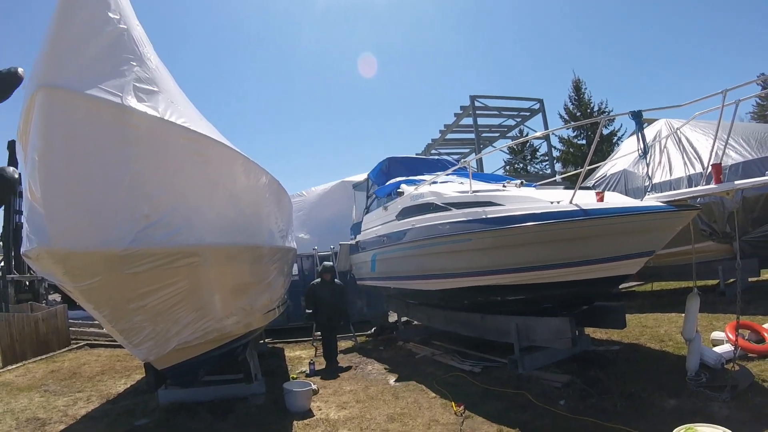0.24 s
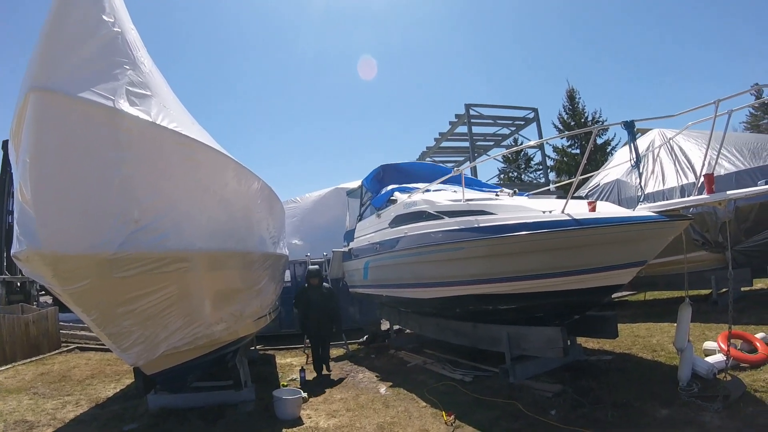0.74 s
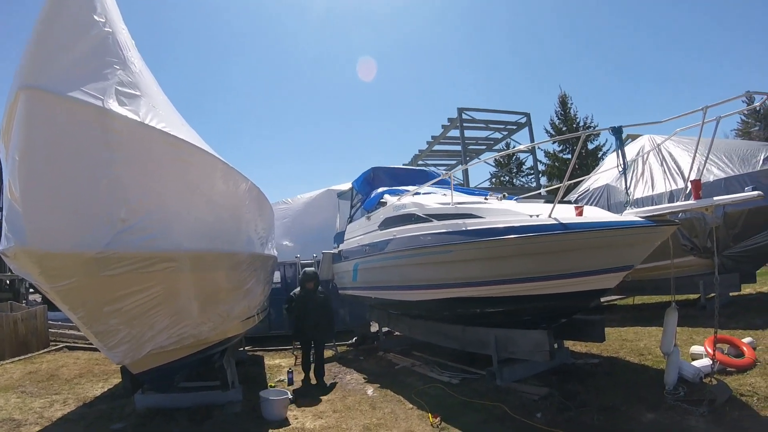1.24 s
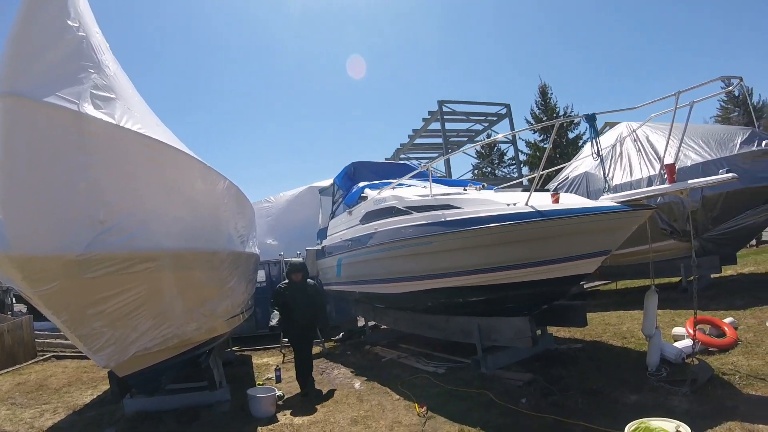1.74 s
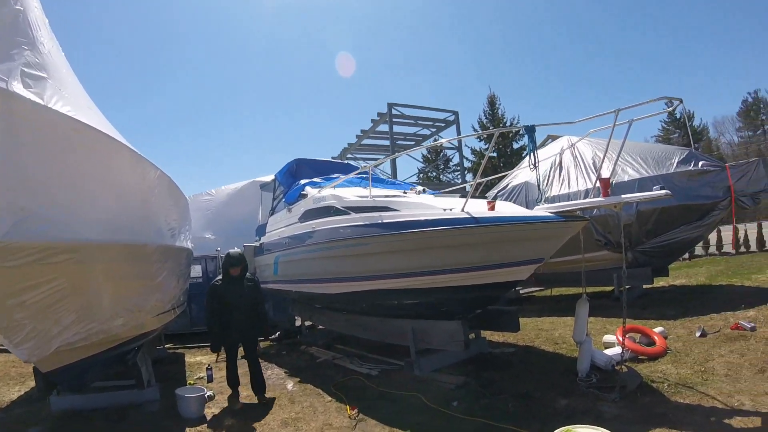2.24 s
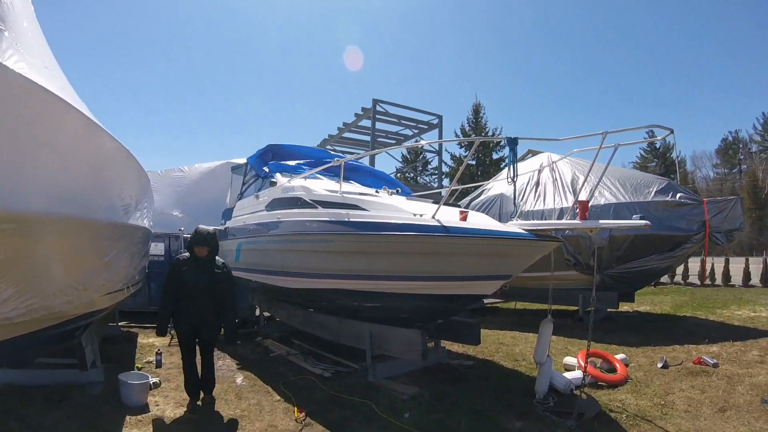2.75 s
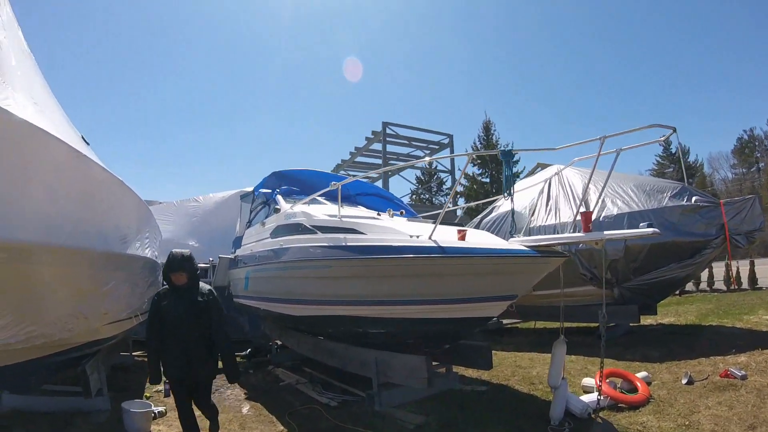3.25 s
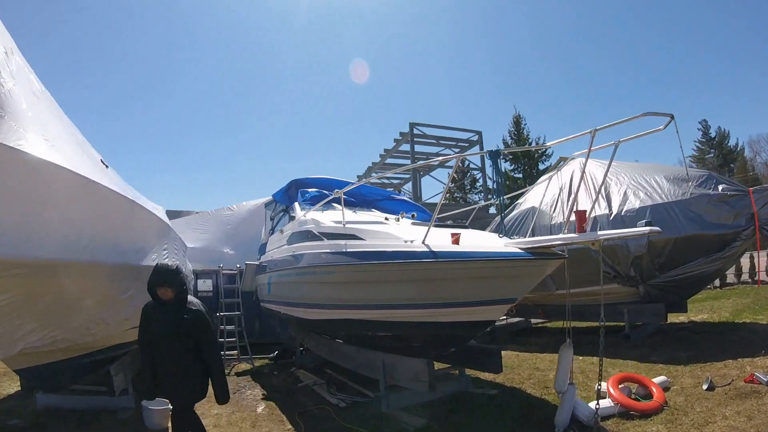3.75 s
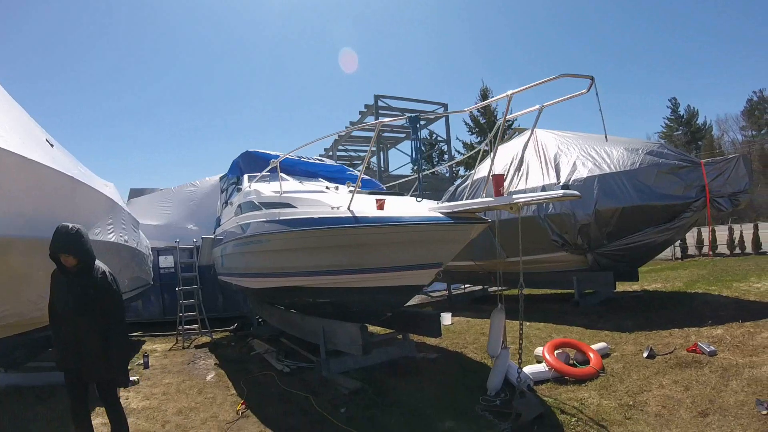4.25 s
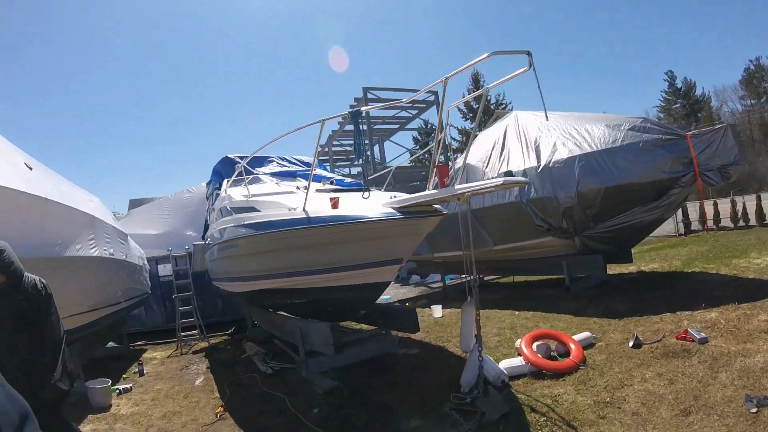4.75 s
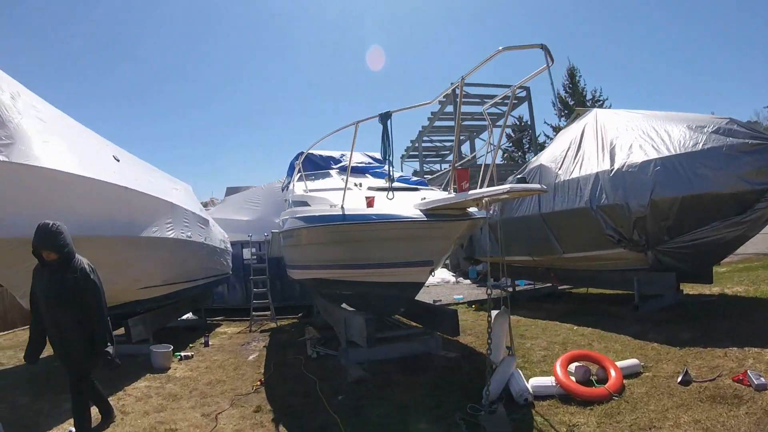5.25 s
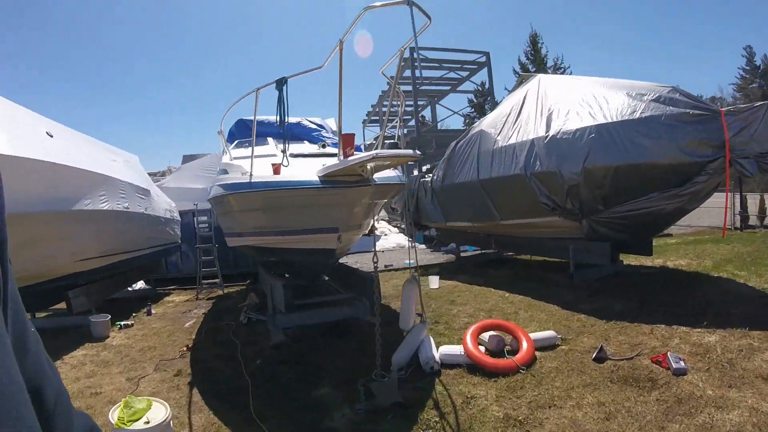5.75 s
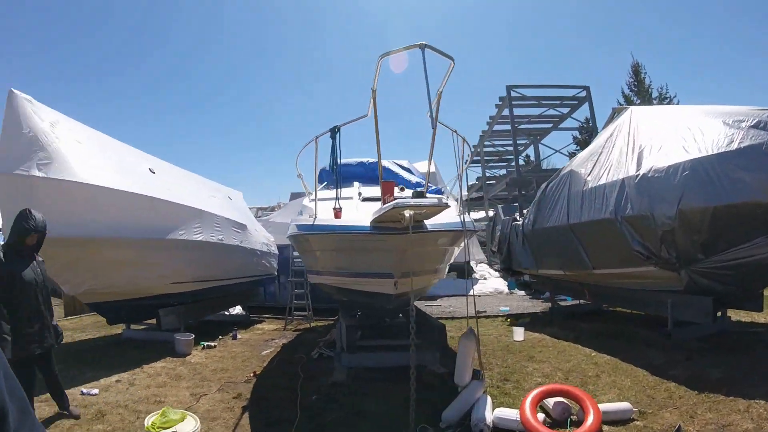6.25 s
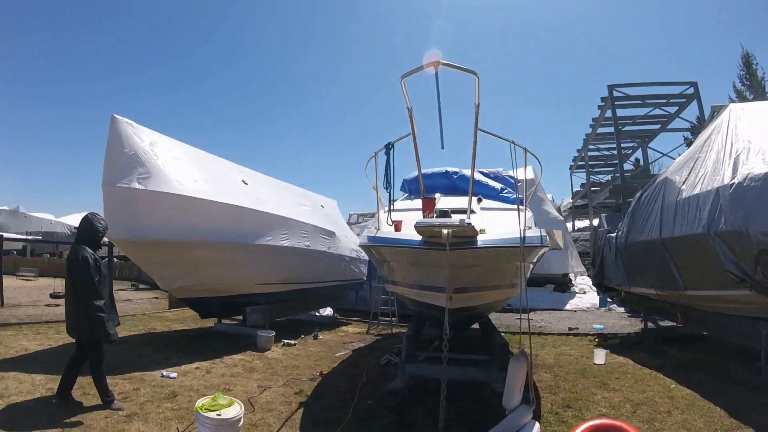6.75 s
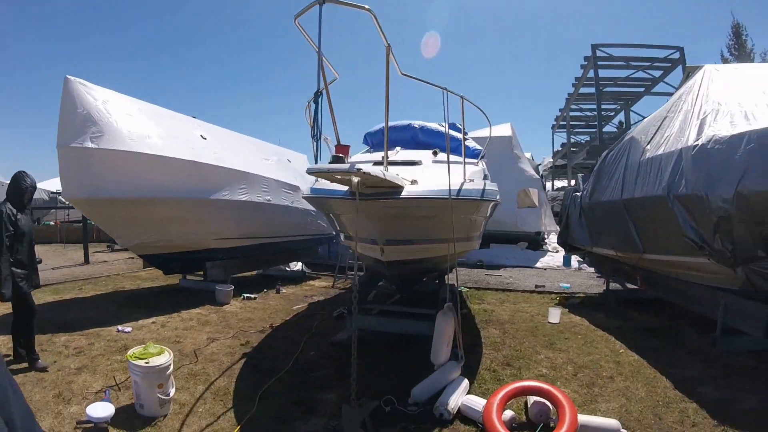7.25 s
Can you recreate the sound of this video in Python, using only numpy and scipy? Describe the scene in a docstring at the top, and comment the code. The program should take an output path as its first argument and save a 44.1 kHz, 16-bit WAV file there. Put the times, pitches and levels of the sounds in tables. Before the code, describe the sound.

From 0 s wind hits an unshielded outdoor microphone in lumpy low rumbles and sharp thuds, fiercest from about 0.8 to 1.2 s, with further gusts near 2 s. Under it an electric buffer runs continuously on a boat hull: a low motor hum around 34 turns per second with a buzzing rasp, a steady whine near 1.2 kHz and soft fan hiss. After 2.3 s the wind drops to light puffs and the machine stands out. Between 2.5 and 4.3 s reflections add a midrange sheen; from 4 s the whine strengthens and scuffing grows. Around 5 to 6.2 s the pad's rapid squeaky clatter swells and the sound is closest and brightest. After 6 s a fuller hull drone rises, strongest past 6.9 s, while treble becomes slightly shaded. A short gust thumps at 6.6 s, a faint high chink rings at 6.94 s, and the buffer is still running at 7.5 s.

```python
"""Gusts buffet the microphone, hardest in the first two seconds, while an electric buffer hums and whines.
The buffer runs steadily against a hull in a boatyard, heard by someone walking past the bows.
Its tones are sine waves tied to the turning angle; rasp, scuffs and air are noise shaped within each turn.
The pad squeaks and scuffs on every turn, and the hulls colour the machine differently along the way.
The wind is lumpy filtered noise, with single push-and-pull waves for the sharp buffets."""
import sys
import numpy as np
from scipy import signal
from scipy.fft import rfft, irfft, next_fast_len
from scipy.io import wavfile
from scipy.ndimage import uniform_filter1d

SR = 44100
rng = np.random.default_rng(int(sys.argv[2]) if len(sys.argv) > 2 else 0)


def pcm_store(signal):
    """Save signal as 16-bit PCM."""
    levels = np.round(np.clip(np.atleast_2d(signal), -1, 1) * 32767)
    wavfile.write(sys.argv[1], SR, levels.astype(np.int16).T)


N = 331191
TIME_S = np.arange(N) / SR
TEETH = 36  # gear teeth passing in each turn


def from_db(db):
    """Turn decibels into a gain."""
    return 10 ** (np.asarray(db) / 20)


def rms_one(x):
    """Scale a sound to unit power."""
    return x / np.sqrt(np.mean(x ** 2) + 1e-20)


def in_time(rows):
    """Draw straight lines through (time, value) points, giving a value at every sample."""
    point_s, value = np.transpose(rows)
    return np.interp(TIME_S, point_s, value)


def drift(rate_hz):
    """Slow random wandering with spread 1: noise smoothed twice, made at a fortieth of the sample rate."""
    r = np.exp(-80 * np.pi * rate_hz / SR)
    noise = rng.standard_normal(N // 40 + 2002)
    slow = signal.lfilter([1], [1, -2 * r, r * r], noise)[2000:]  # skip the filter's start-up
    return np.interp(np.arange(N) / 40, np.arange(len(slow)), rms_one(slow))


def colour(x, spectrum):
    """Give a steady sound a spectrum that falls away steeply past its ends; rms 1."""
    size = next_fast_len(N)
    hz, db = np.transpose(spectrum)
    f = np.maximum(np.fft.rfftfreq(size, 1 / SR), 1)
    gain = from_db(np.interp(np.log(f), np.log(hz), db))
    gain = gain * np.minimum(1, np.minimum(f / hz[0], hz[-1] / f)) ** 4
    return rms_one(irfft(rfft(x, size) * gain, size)[:N])


def resonate(x, hz, width_hz):
    """A resonance applied twice, for steep flanks; the width is that of one pass; rms 1."""
    r = np.exp(-np.pi * width_hz / SR)
    section = [1, 0, -1, 1, -2 * r * np.cos(2 * np.pi * hz / SR), r * r]
    return rms_one(signal.sosfilt([section, section], x))


def swells_db(rows, attack_s, release_s, quiet_db):
    """Each swell rises, holds and dies away above a quiet level; the strongest prevails."""
    level = 0
    for full_s, hold_s, db in rows:
        before = np.maximum(full_s - TIME_S, 0) / attack_s
        after = np.maximum(TIME_S - full_s - hold_s, 0) / release_s
        level = np.maximum(level, from_db(db) * np.exp(-np.minimum(before + after, 20)))
    return 20 * np.log10(np.hypot(level, from_db(quiet_db)))


def zone_db(middle_s, half_width_s, edge, outside_db, change_db):
    """Level along a stretch of the path where hulls lift or shade a sound; a high edge is abrupt."""
    away = np.abs((TIME_S - middle_s) / half_width_s)
    return outside_db + change_db * np.exp(-away ** edge)


def direct_db(nearest_db, share):
    """Level along a straight walk past the machine, with a share of the full loss with distance."""
    nearest_s, nearest_m, walk_m_per_s = 6.04, 2.15, 1.44
    along_m = walk_m_per_s * (TIME_S - nearest_s)
    return nearest_db - share * 20 * np.log10(np.hypot(along_m, nearest_m) / nearest_m)


def shade_db():
    """Level change as a hull comes to stand in the way near the end of the path."""
    return zone_db(middle_s=8, half_width_s=.92, edge=11, outside_db=0, change_db=-4.5)


def shaded(x):
    """The hull in the way weakens the treble and lets the low part through."""
    low = signal.sosfiltfilt(signal.butter(2, 1400, fs=SR, output="sos"), x)
    return low + from_db(shade_db()) * (x - low)


def far_drone_db():
    """Level of the far hull's drone, shared by everything that rises with it."""
    # along the path: time_s, level_db
    drone_points = [(0, -66), (4.6, -57.5), (5.7, -57), (6.1, -48), (6.4, -47), (6.55, -46.5), (6.85, -41),
                    (6.95, -38.5), (7.25, -36.5), (7.36, -36), (7.51, -37)]
    return in_time(drone_points)


def clatter_db():
    """The hulls throw the pad's clatter across the path in a few swells."""
    # before each sound's own offset: full_strength_s, hold_s, level_db
    clatter_swells = [(5.05, 0.08, -52), (5.72, 0.12, -47.5), (5.9, 0.14, -48.5), (6.13, 0.11, -50.5)]
    return swells_db(clatter_swells, attack_s=0.22, release_s=0.24, quiet_db=-65)


def tones(turn, orders, wander_db, rough_db):
    """Multiples of the speed flutter with the load and swell and fade as the path crosses reflections."""
    total = 0
    for multiple, db in orders:
        level_db = db + wander_db * drift(0.45) + rough_db * drift(32)
        total = total + from_db(level_db) * np.sin(2 * np.pi * (multiple * turn + rng.random()))
    return total


def friction(turn, repeat, count=260, size=8192):
    """The same rough spots pass on every turn and slowly change; the rest is fresh noise."""
    rough = 0
    for _ in range(2):
        # one turn's pattern: equally strong waves with chance phases
        track = irfft(np.r_[0, np.exp(2j * np.pi * rng.random(count))], size)
        rough = rough + drift(0.44) * np.interp(turn % 1, np.arange(size) / size, track, period=1)
    rough = rough / np.sqrt(uniform_filter1d(rough ** 2, SR // 10) + 1e-20)
    # the repeating part covers only the lower part of the spectrum
    bandwidth_share = count * turn[-1] / (N / 2)
    return np.sqrt(repeat * bandwidth_share) * rough + np.sqrt(1 - repeat) * rng.standard_normal(N)


def throb(turn, once_db, twice_db, four_db):
    """The load rises and falls once, twice and four times within each turn."""
    angle = 2 * np.pi * turn
    return from_db(once_db * np.cos(angle) + twice_db * np.cos(2 * angle) + four_db * np.cos(4 * angle))


def from_place(turn, place):
    """Turns since the nearest pass of a place on the circle, -.5 to .5."""
    return (turn - place + .5) % 1 - .5


def top_hiss():
    """Faint, steady noise high in the treble."""
    # colour of the hiss: pitch_hz, level_db per Hz
    hiss_colour = [(7000, 8.5), (9300, 4), (10200, -5.5), (11700, -1.5), (13000, -5.5), (14500, -16)]
    return from_db(-67) * colour(rng.standard_normal(N), hiss_colour)


def turbulence(spectrum, lumpy_db):
    """Lumpy noise whose power is evened out over a thirtieth of a second."""
    x = colour(rng.standard_normal(N) * from_db(lumpy_db * drift(64)), spectrum)
    return x / np.sqrt(uniform_filter1d(x ** 2, SR // 30) + 1e-9)


def buffets(cycles=0.38):
    """An eddy crossing the microphone's port pushes and pulls once."""
    # sharp buffets, centred half a cycle after start_s: start_s, level_db, pitch_hz
    sharp_buffets = [(0.058, -15.5, 408), (0.334, -27, 385), (0.343, -15.5, 262), (0.497, -15, 160),
                     (0.53, -15, 169), (0.534, -18.5, 467), (0.555, -20, 417), (0.595, -17, 466),
                     (0.663, -27, 332), (0.709, -22, 314), (0.732, -17.5, 423), (0.779, -21.5, 430),
                     (0.807, -10, 357), (0.818, -6, 130), (0.837, -11, 272), (0.842, -18, 756),
                     (0.858, -7, 171), (0.859, -15, 540), (0.872, -33, 700), (0.89, -25, 448),
                     (0.907, -23, 300), (0.937, -23, 617), (0.959, -25, 520), (0.967, -31, 497),
                     (1.018, -18, 516), (1.047, -19, 560), (1.062, -31, 563), (1.082, -13, 180),
                     (1.09, -20.5, 650), (1.095, -35, 1490), (1.103, -13, 443), (1.111, -17.5, 560),
                     (1.124, -29, 800), (1.155, -9, 130), (1.163, -24, 495), (1.172, -28, 520),
                     (1.185, -19, 595), (1.21, -17, 360), (1.352, -20, 326), (1.503, -21, 333),
                     (1.909, -24, 337), (1.944, -18, 395), (1.95, -17, 437), (1.975, -16.5, 526),
                     (1.976, -14, 219), (2.002, -31, 496), (2.08, -22, 192), (2.103, -13.5, 308),
                     (2.242, -17.5, 200), (3.091, -15, 130), (3.127, -16, 132), (3.156, -20.5, 260),
                     (3.4, -21, 110), (4.158, -27, 74), (5.511, -18, 131), (6.344, -20, 75),
                     (6.61, -12.5, 169)]
    out = np.zeros(N)
    for start_s, db, hz in sharp_buffets:
        near = np.abs(TIME_S - start_s) < .06
        phase = (TIME_S[near] - start_s) * hz - .5
        out[near] += from_db(db) * np.sin(2 * np.pi * phase) * np.exp(-.5 * (phase / cycles) ** 2)
    return out


def wind(strong_db=-14.0, top=0.54):
    """Eddies rumble on the port; small ones grow faster than the gust, and the biggest swings saturate."""
    # gusts, before the offsets below: full_strength_s, hold_s, level_db, small_eddy_lift_db
    gusts = [(0.03, 0.044, -25.5, -6), (0.155, 0.04, -29, -6), (0.291, .07, -20, -3),
             (0.509, 0.047, -17, 0.5), (0.583, 0.026, -22, 1.5), (0.64, 0.023, -28.5, 5.5),
             (0.698, 0.048, -26.5, 6.5), (0.787, 0.016, -19, 0.5), (0.828, 0.038, -11, -1.5),
             (0.892, 0.041, -19.5, 1.5), (0.956, 0.018, -13.5, -2), (1.035, 0.0083, -17.5, 2.5),
             (1.065, 0.064, -11, -4), (1.156, 0.036, -9.5, -7), (1.352, 0.032, -24, -0.5),
             (1.444, 0.0057, -28, 7), (1.49, 0.015, -21.5, -1.5), (1.566, 0.0096, -23, -17),
             (1.824, .06, -22, -11), (1.907, 0.089, -22, -1.5), (2.04, 0.07, -23, -1.5),
             (2.173, 0.017, -20.5, -3.5), (2.191, 0.063, -20.5, -2), (2.798, 0.013, -27, -8),
             (3.06, .02, -27, -4), (3.087, 0.068, -24.5, -4), (3.19, .055, -25, -10), (3.398, .015, -33, 2),
             (3.49, 0.031, -31.5, -1), (4.153, 0.022, -30, -3), (5.36, .01, -34, 6), (5.503, .08, -30.5, 0),
             (5.662, 0.027, -28, -6), (6.007, 0.028, -27, -11), (6.324, 0.022, -29, -4),
             (6.502, 0.039, -23.5, -4), (6.602, .02, -27, 3.5), (7.204, 0.026, -29.5, -9)]
    # light breeze between the gusts: time_s, level_db
    breeze = [(0, -30.5), (1.6, -31.5), (2.6, -36.5), (3.4, -35.5), (3.75, -37.5), (4.0, -42.5), (5.1, -41),
              (5.6, -32), (6.4, -31.5), (7.5, -40)]
    # colour of the slow eddies: pitch_hz, level_db per Hz
    eddies = [(12, -24), (28, -11), (52, 0.5), (80, -4), (130, -7), (200, -17.5), (320, -21), (500, -38),
              (900, -62.5)]
    # colour of the small eddies that strong gusts tear off: pitch_hz, level_db per Hz
    small_eddies = [(70, -5.5), (170, 5.5), (280, -2), (400, -9.5), (600, -22.5), (1000, -53.5),
                    (1600, -58.5), (3000, -52.5)]
    # colour of the tiny eddies that only the hardest gusts tear off: pitch_hz, level_db per Hz
    tiny_eddies = [(500, -2), (900, -5), (1400, -11), (2200, -21)]

    breeze_db = in_time(breeze) + 3.5 * drift(6.1)
    large = [(full_s, hold_s, db) for full_s, hold_s, db, _ in gusts]
    small = [(full_s, hold_s, db + lift_db) for full_s, hold_s, db, lift_db in gusts]
    large_db = swells_db(large, attack_s=.012, release_s=.018, quiet_db=breeze_db) - strong_db
    small_db = swells_db(small, attack_s=.012, release_s=.018, quiet_db=breeze_db) - strong_db

    rumble_db = strong_db - 2 + large_db + 0.83 * drift(14.0)
    rumble = from_db(rumble_db) * turbulence(eddies, lumpy_db=5.5)
    flutter_db = strong_db - 2 + 1.366 * small_db
    flutter = from_db(flutter_db) * turbulence(small_eddies, lumpy_db=4.0)
    spatter = from_db(-42 + 1.7 * small_db) * turbulence(tiny_eddies, lumpy_db=6)
    return top * np.tanh((rumble + flutter + spatter + buffets()) / top)


def chink():
    """A light chink nearby: one small part rings and dies away."""
    start_s, level_db, pitch_hz = 6.938, -45, 5250
    t60_s = .07  # time to fade by 60 dB
    age_s = np.clip(TIME_S - start_s, 0, 2 * t60_s)
    return from_db(level_db - 60 * age_s / t60_s) * np.sin(2 * np.pi * pitch_hz * age_s)


def far_whistle():
    """A faint, narrow band of air noise rises with the far hull's drone."""
    return from_db(far_drone_db() - 30) * resonate(rng.standard_normal(N), hz=5800, width_hz=160)


def thin_tone():
    """An unsteady high tone, not locked to the turn, sounds in short bursts over a narrow band of noise."""
    # bursts of the tone: full_strength_s, hold_s, level_db
    ring_swells = [(0.27, .05, -62), (2.25, .04, -62), (4.23, .04, -57.5), (4.49, .07, -60.5),
                   (4.61, .04, -61), (4.68, .045, -58.5), (4.79, .05, -61.5), (5.08, .035, -60),
                   (5.75, .06, -57), (5.83, .04, -55), (6.1, .035, -58), (6.18, .03, -59), (6.26, .1, -62),
                   (6.46, .035, -59), (6.53, .09, -61), (6.77, .11, -58.5), (6.96, .2, -58),
                   (7.24, .04, -58), (7.35, .075, -56.5), (7.47, .04, -55)]
    # breathy band along the path: time_s, level_db
    ring_breath = [(0, -65.5), (2.5, -64), (4.6, -68), (5.3, -81), (5.7, -68), (6.7, -57), (7.1, -60.5),
                   (7.5, -56)]
    pitch_hz, waver_hz = 2162, 7
    ring_db = swells_db(ring_swells, attack_s=.016, release_s=.02, quiet_db=-63.5) + 1.3 * drift(35)
    phase = 2 * np.pi * np.cumsum(pitch_hz + waver_hz * drift(31.5)) / SR
    ring = from_db(ring_db) * np.sqrt(2) * np.sin(phase)
    breath = from_db(in_time(ring_breath)) * resonate(rng.standard_normal(N), pitch_hz, width_hz=110)
    return ring + breath


def cooling_air(turn):
    """The fan's air pulses with the turn and whistles faintly in the casing."""
    # colour of the air: pitch_hz, level_db per Hz
    air_colour = [(1500, 11.5), (3000, 3), (3700, 0), (4300, 4), (5000, 3), (5550, 5), (6050, 0.5),
                  (6550, 6), (7100, -3), (8300, -7), (9300, -29), (10200, -20)]
    # the air along the path, before the 2.5 dB added below: time_s, level_db
    air_points = [(0, -59), (2.25, -59.5), (2.45, -58.5), (2.8, -57), (3.25, -59), (3.9, -57), (5.0, -56.5),
                  (5.9, -55.8), (6.45, -54.5), (6.8, -56.5), (7.5, -57.5)]
    # narrow resonances of the casing: pitch_hz, width_hz, level_db against the air
    casing = [(3536, 54, -15.5), (3700, 480, -13), (4690, 83, -21), (5140, 90, -20), (5530, 70, -22),
              (5610, 90, -20.5), (6020, 120, -19), (6500, 45, -23), (6480, 130, -27)]
    flow = friction(turn, repeat=0.17) * throb(turn - .5, once_db=1.05, twice_db=0.95, four_db=1.3)
    air = colour(flow, air_colour)
    for hz, width_hz, db in casing:
        air = air + from_db(db + 1.0 * drift(0.61)) * resonate(flow, hz, width_hz)
    return from_db(in_time(air_points) + 2.5 + .5 * drift(25)) * air


def squeaks(turn, speed):
    """One short chirp per turn, rising in pitch and slightly unsteady; rms 1."""
    middle_hz, rise_hz_per_s, length_s, jitter_rad = 1530, 38000, .0031, .45
    age_s = from_place(turn, 0) / speed
    phase = 2 * np.pi * (middle_hz + .5 * rise_hz_per_s * age_s) * age_s + jitter_rad * drift(25)
    loudness = np.exp(-.5 * (age_s / length_s) ** 2) * from_db(.5 * drift(20))
    return rms_one(loudness * np.sin(phase))


def pad_contact(turn, speed):
    """On every turn the pad squeaks, then its edge scuffs the hull twice, rubbing lightly in between."""
    # scuffs in each turn: place_turns, width_turns, level_db
    scuff_places = [(.28, .06, 0), (.53, .08, 0)]
    # colour of a scuff: pitch_hz, level_db per Hz
    scuff_colour = [(2200, 0), (2600, -6.5), (3000, 2), (3300, 4), (3600, 0.5), (3950, 5.5), (4300, -5.5),
                    (6000, -8), (7500, -23)]
    # strength of the scuffs along the path: time_s, level_db
    scuff_points = [(0, -63), (2.2, -66.5), (2.5, -61.5), (3.9, -63), (4.4, -56.5), (4.6, -56),
                    (5.1, -56.5), (5.5, -59.5), (5.85, -76), (6.35, -55.5), (6.85, -62), (7.5, -57)]
    touch = .35  # the light rubbing in between
    for place, width, db in scuff_places:
        touch = touch + from_db(db) * np.exp(-.5 * (from_place(turn, place) / width) ** 2)
    scuffs = from_db(in_time(scuff_points)) * colour(friction(turn, repeat=0.39) * touch, scuff_colour)
    return scuffs + from_db(clatter_db() - 2 + shade_db()) * squeaks(turn, speed)


def buffer_noise(turn):
    """The pad rasps and slaps, and the hulls resonate in bands of this turning noise."""
    # pad and bearing rasp: pitch_hz, level_db per Hz
    rasp_colour = [(200, 5.5), (310, 16), (440, 5), (560, 2.5), (800, 2), (930, -9.5), (1150, 4.5),
                   (1380, -2.5), (1750, -2.5), (2300, -9), (2700, -7), (3700, -20), (4400, -18.5),
                   (7000, -26)]
    # the far hull's drone: pitch_hz, level_db per Hz
    drone_colour = [(270, 4), (330, 10.5), (400, -4), (480, 3.5), (600, 3.5), (700, -1.5), (820, -13),
                    (960, -7), (1400, -22)]
    rasp = friction(turn, repeat=0.18) * throb(turn, once_db=0.0, twice_db=0.7, four_db=-0.5)
    rasp = from_db(direct_db(nearest_db=-42.5, share=0.47)) * shaded(colour(rasp, rasp_colour))

    slaps = friction(turn, repeat=0.8) * throb(turn + .3, once_db=.5, twice_db=1.2, four_db=2.5)
    clatter = from_db(clatter_db() - 1.5) * resonate(slaps, hz=1560, width_hz=250)

    rub = friction(turn, repeat=.4) * throb(turn, once_db=-1.5, twice_db=1.0, four_db=0.5)
    bright_db = zone_db(middle_s=5.92, half_width_s=.7, edge=2.0, outside_db=-66, change_db=13.5)
    bright = from_db(bright_db) * resonate(rub, hz=2860, width_hz=1770)

    drone = friction(turn, repeat=0.55) * throb(turn, once_db=1.0, twice_db=.8, four_db=0.0)
    drone = from_db(far_drone_db()) * colour(drone, drone_colour)

    hollow_db = zone_db(middle_s=6.5, half_width_s=2, edge=5, outside_db=-52, change_db=-6)
    hollow = from_db(hollow_db) * resonate(friction(turn, repeat=0.55), hz=775, width_hz=170)

    # pad noise thrown back by the first hull
    sheen_db = zone_db(middle_s=3.4, half_width_s=.95, edge=6, outside_db=-72, change_db=13.5)
    sheen = from_db(sheen_db) * resonate(friction(turn, repeat=1.0), hz=1780, width_hz=420)
    return rasp + clatter + bright + drone + hollow + sheen


def buffer_tones(turn):
    """Rotating parts hum at multiples of the speed, and the gear teeth whine as each one passes."""
    # low hum: speed_multiple, relative_level_db
    hum_lines = [(1, -3.5), (2, 2), (3, -13.5), (4, -4.5), (5, -5.5), (6, -3), (7, -19.5), (8, -5),
                 (9, -10.5), (10, -13), (11, -22), (12, -17), (13, -19.5), (14, -28.5), (15, -40.5),
                 (16, -24.5)]
    # lines around the gear whine: speed_multiple, relative_level_db
    gear_lines = [(28, -5.5), (30, -13), (32, -1.5), (38, -1.5)]
    # higher gear lines, which a hull can shade: speed_multiple, relative_level_db
    high_gear_lines = [(47, -8), (50, -14.5), (52, -15.5), (72, -9.5), (76, -13.5), (80, -12)]
    # tones in the far hull's drone: speed_multiple, level_db against the drone
    far_lines = [(8, -7), (10, -9), (16, -16), (20, -16), (28, -14.5)]
    hum = tones(turn, hum_lines, wander_db=0.4, rough_db=1.35)
    hum = from_db(direct_db(nearest_db=-30, share=0.71)) * hum

    whine_db = zone_db(middle_s=5.5, half_width_s=1.47, edge=4, outside_db=-49.5, change_db=8)
    whine = from_db(whine_db + 0.68 * drift(15)) * np.sin(2 * np.pi * TEETH * turn)

    gears = tones(turn, gear_lines, wander_db=1.5, rough_db=2.8)
    gears = gears + shaded(tones(turn, high_gear_lines, wander_db=-1.0, rough_db=4.5))
    gears = from_db(direct_db(nearest_db=-52, share=0.59)) * gears

    drone_tones = from_db(far_drone_db()) * tones(turn, far_lines, wander_db=-0.7, rough_db=4.5)
    return hum + whine + gears + drone_tones


def scene():
    """The speed trembles slightly; the machine's hum, rasp and air follow its angle."""
    # pitch of the gear whine, which follows the load on the pad: time_s, pitch_hz
    whine_pitch = [(0.2, 1228), (0.55, 1230), (2.13, 1228), (5.43, 1236), (6.29, 1231), (7.08, 1235),
                   (7.51, 1228)]
    speed = in_time(whine_pitch) / TEETH  # turns per second
    turn = np.cumsum(speed * (1 + .001 * drift(8.0))) / SR
    background = top_hiss() + wind() + chink()
    air = far_whistle() + thin_tone() + cooling_air(turn)
    machine = pad_contact(turn, speed) + buffer_noise(turn) + buffer_tones(turn)
    return (background + air + machine)[None]


def record(dry):
    """A steep filter cuts the top above 14.8 kHz."""
    return signal.sosfilt(signal.ellip(10, .1, 80, 14800, fs=SR, output="sos"), dry)


dry = scene()
out = record(dry)
pcm_store(out)
```